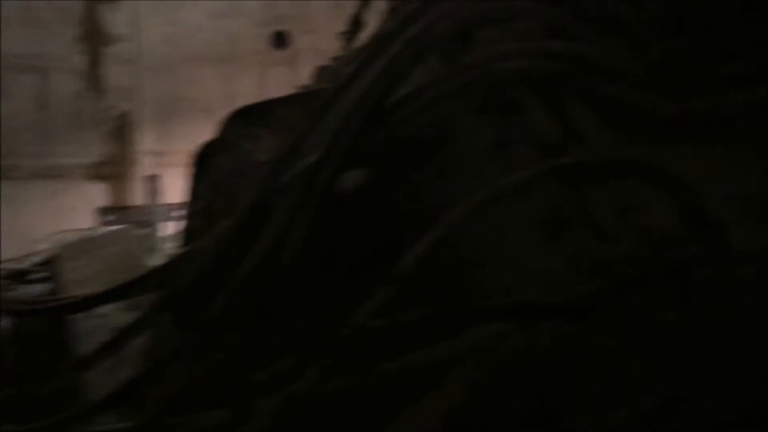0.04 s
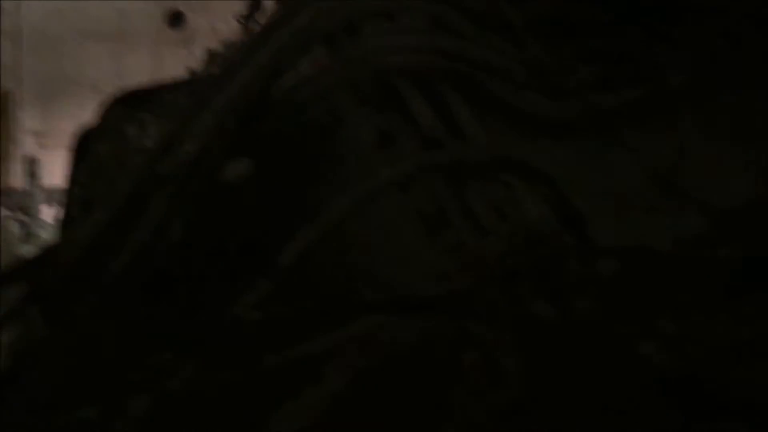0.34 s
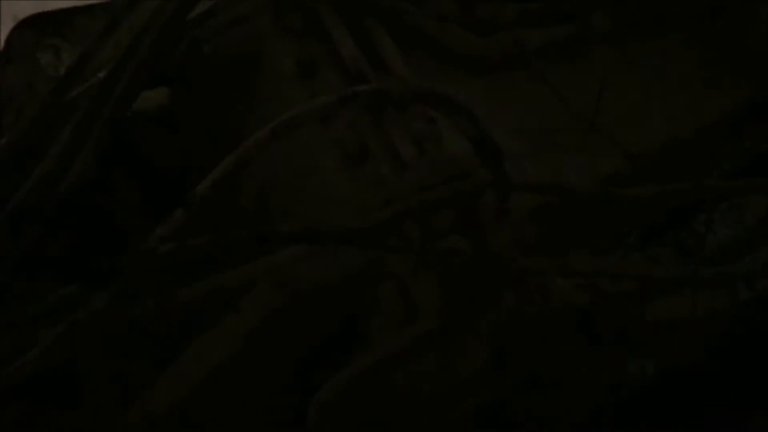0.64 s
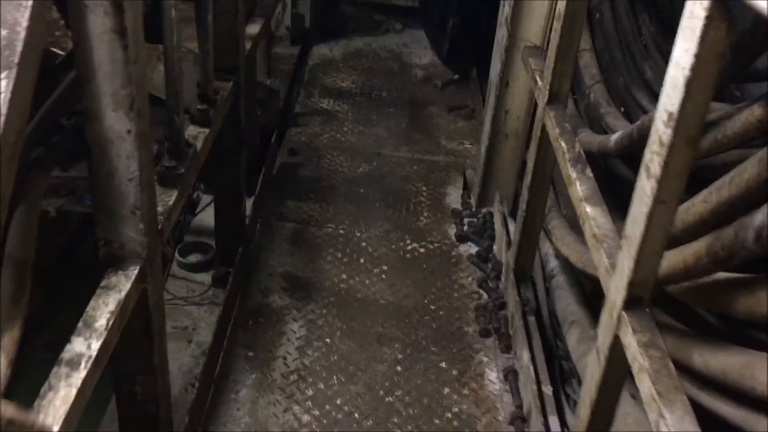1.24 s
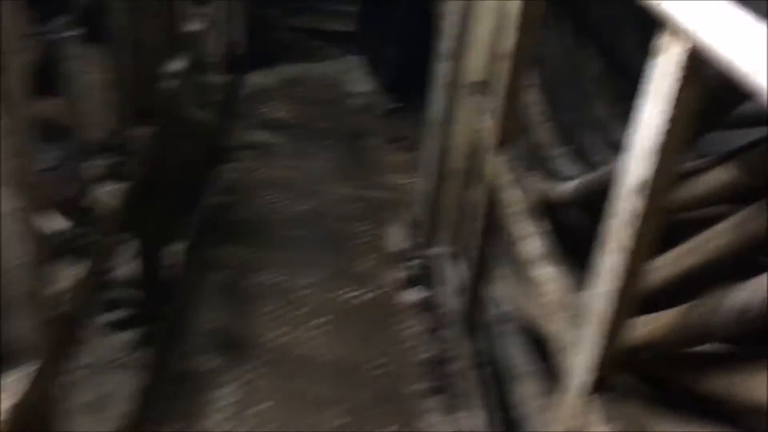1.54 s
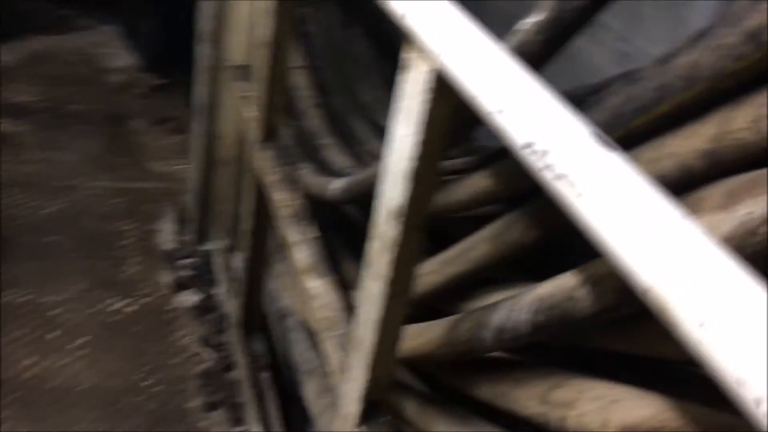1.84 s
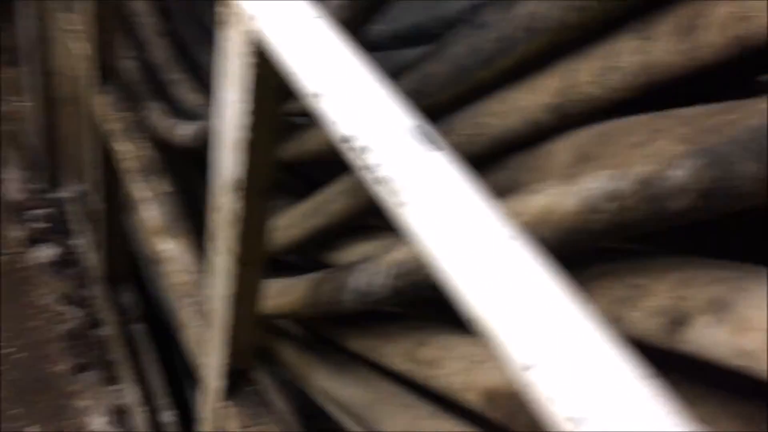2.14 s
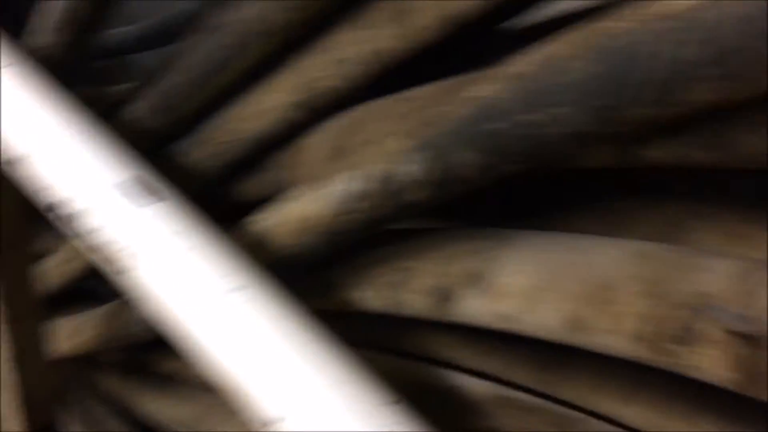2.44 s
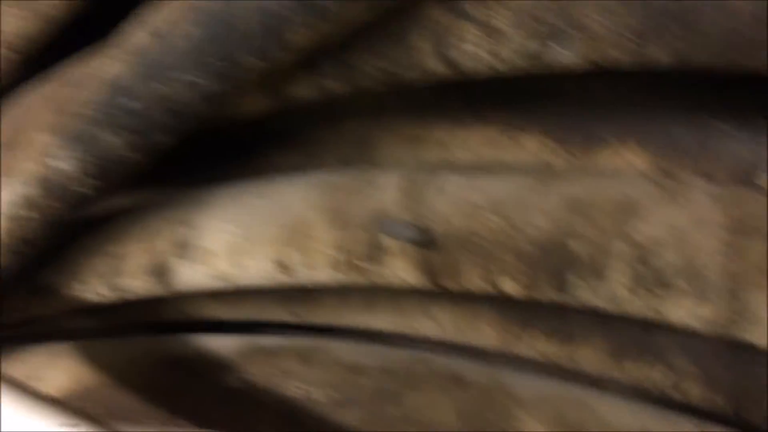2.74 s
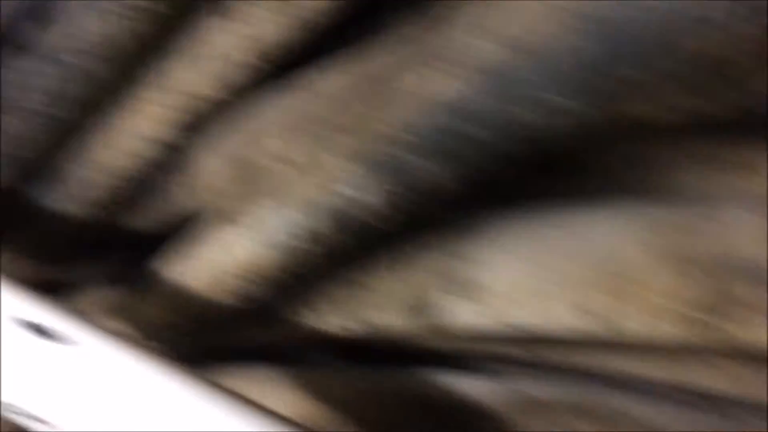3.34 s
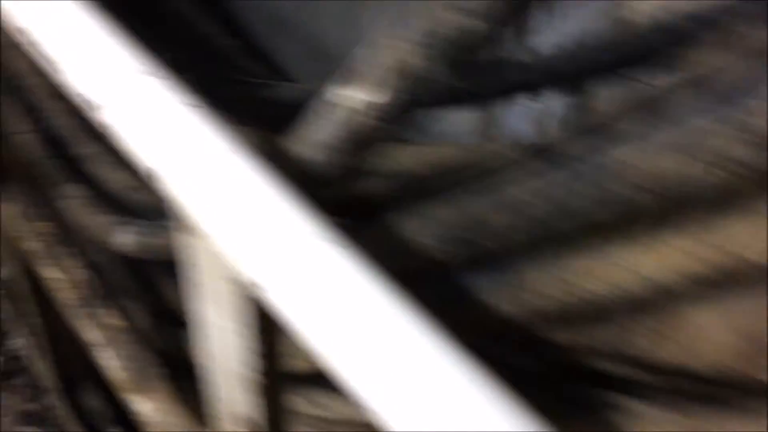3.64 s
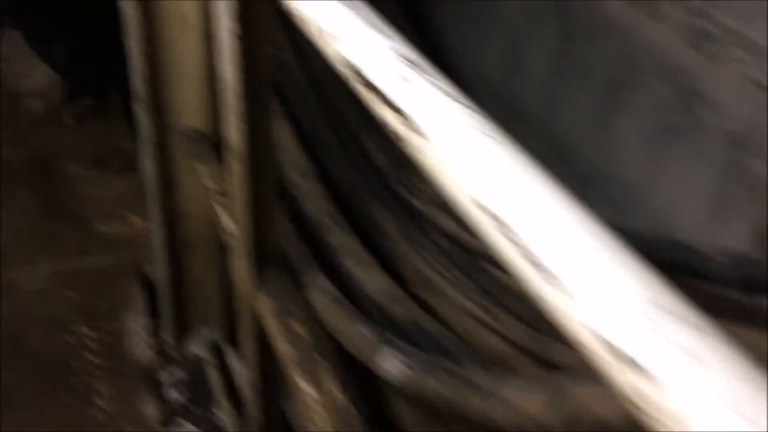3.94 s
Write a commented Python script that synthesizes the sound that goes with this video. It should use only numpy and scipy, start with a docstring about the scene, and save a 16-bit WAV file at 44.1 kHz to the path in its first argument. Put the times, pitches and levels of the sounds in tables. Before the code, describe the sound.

A pump motor's steady hum fills a tunnel, with roaring ventilation and a low rumble.

```python
"""A pump motor hums on its fifth shaft order in a tunnel, over ventilation roar and low rumble.
Shaft harmonics make the hum and a whine; reverberation makes the tones waver. Moving air makes the
noise, with narrow peaks and dips above 700 Hz. Heard first beside the machine, then, after a short
silence, from a steel walkway, where other motors hum along and a thin hiss fades and returns."""
import sys
import numpy as np
from scipy import signal
from scipy.fft import rfft, irfft
from scipy.io import wavfile

SR = 44100
rng = np.random.default_rng(int(sys.argv[2]) if len(sys.argv) > 2 else 0)


def unload_wav(signal):
    """Save mono or channel-first audio to the path in sys.argv[1] as 16-bit WAV at rate SR, clipped to [-1, 1]."""
    wavfile.write(
        sys.argv[1],
        SR,
        np.round(np.clip(np.atleast_2d(signal).T, -1, 1) * 32767).astype(np.int16),
    )


N = 176400
T = np.arange(N) / SR
FREQS = np.maximum(np.fft.rfftfreq(N, 1 / SR), 1)
SHAFT_HZ = 58.31

# listening spots (0 beside the machine, 1 walkway): start t/s, end t/s
SPOTS = [(-0.01, 0.984), (1.116, 4.02)]
# base air noise density: f/Hz, machine level/(dB per Hz), walkway level/(dB per Hz)
AIR_SPECTRUM = [(22, -70, -66), (35.2, -64.5, -63), (55.6, -40.5, -45.5), (75, -40.5, -46),
                (113, -47, -46.5), (160, -43.5, -49.5), (199.6, -48.5, -47), (236.4, -40.5, -43),
                (269, -46, -47), (313, -43, -53), (385, -52.5, -54.5), (424, -47, -54.5), (500, -51, -50),
                (547, -46.5, -51), (631, -53, -53), (696, -55.5, -58), (770, -51.5, -55.5),
                (1076, -54.5, -61), (1465, -56.5, -59.5), (1796, -56.5, -62.5), (2004, -62, -66.5),
                (2670, -66.5, -72), (3270, -71.5, -75.5), (4010, -75.5, -74.5), (4790, -78.5, -84.5),
                (5680, -79.5, -83), (7800, -87, -90), (9450, -88, -89.5), (10400, -94.5, -95),
                (11500, -91.5, -92.5), (15400, -96, -91)]
# swells of the four air bands, per spot: t/s, gain/dB
DEEP_SWELL = [
    [(0, 1), (.25, 0), (.48, 0), (.66, -8), (.8, 2), (.98, 3)],
    [(1.12, -6), (1.55, -10), (1.85, 0), (2.2, 1), (2.55, 1), (3.3, -3.5), (3.78, 8), (4, 5.5)],
]
RUMBLE_SWELL = [
    [(0, 2.5), (.3, 0.5), (.48, -1.5), (.66, -4), (.78, 4), (.98, -8)],
    [(1.12, 0), (1.5, 0), (2.2, -1), (3.25, -0.5), (3.7, -2), (3.78, -2), (4, -6)],
]
ROAR_SWELL = [
    [(0, .3), (.38, -0.14), (.65, -0.61), (.98, -1)],
    [(1.12, 3), (1.45, 0.4), (2.4, 0.06), (3, -1.4), (3.4, -0.7), (3.9, 1.5)],
]
HISS_SWELL = [
    [(0, -.8), (.4, .8), (.98, -0.2)],
    [(1.12, 4.5), (1.65, 2.5), (2.4, 0.2), (3, -3), (3.4, -3.8), (3.8, 1)],
]
# motors along the walkway: f/Hz, level/dB
MOTOR_TONES = [(120, -35.5), (551, -32.5), (775, -39), (953, -42), (1809, -51.5)]
# fan tone and its rush in the duct: t/s, level/dB
FAN_LEVEL = [(1.12, -30), (1.3, -28), (1.45, -27), (1.55, -31), (1.63, -29.5), (1.78, -26), (1.98, -39),
             (2.15, -32), (2.4, -46), (2.85, -47), (3.15, -28), (3.42, -31), (3.6, -36)]
RUSH_LEVEL = [(1.12, -26.5), (1.6, -28), (1.95, -36), (2.5, -35), (3.05, -40), (3.5, -27), (4, -35)]
# faint pump tones: shaft order (rounded in use), machine level/dB, walkway level/dB
PUMP_TONES = [(1, -29.5, -34), (2, -36, -35.5), (7, -39, -54), (10, -31.5, -39), (15, -44, -40),
              (17, -37, -56.5), (20, -35.5, -41.5), (25, -35, -46.5), (29, -52, -61), (30, -48, -57),
              (35, -52, -62), (40, -43.5, -65), (41, -52.5, -73), (44, -55, -70), (49, -58, -60),
              (50, -63, -57.5), (54, -63, -69), (62.4, -54, -69), (71, -57, -67), (72.5, -55, -76),
              (89.6, -63, -73)]
# pump hum (order 5) and drone (order 4), per spot: t/s, level/dB
HUM_LEVEL = [
    [(0, -20), (.5, -17.5), (.98, -17.5)],
    [(1.12, -16), (2.2, -16), (2.72, -14.5), (3.25, -15.5), (3.52, -18.5), (3.67, -28), (3.78, -23),
     (4, -20.5)],
]
DRONE_LEVEL = [
    [(0, -30), (.19, -40), (.27, -26), (.46, -18), (.66, -22), (.85, -26.5)],
    [(1.12, -21.5), (1.41, -19), (1.55, -29), (2.6, -30), (3.35, -31.5), (3.6, -24), (3.71, -29),
     (3.77, -14), (3.84, -37), (3.93, -17.5), (4, -33)],
]
# treble dropouts: centre t/s, length/s, edge f/Hz, gain/dB
TREBLE_DIPS = [(0.17, 0.012, 5000, -13.5), (0.321, 0.029, 5430, -27), (0.621, 0.0093, 3600, -15),
               (3.65, .012, 3800, -16)]


def from_db(db):
    """Decibels to gain."""
    return 10 ** (np.asarray(db) / 20)


def unit_rms(x):
    """Scale to rms 1."""
    return x / np.sqrt(np.mean(x ** 2) + 1e-20)


def curve(rows):
    """Linear interpolation of (t/s, value) rows."""
    return np.interp(T, *np.transpose(rows))


def lowpass_power(edge_hz, order):
    """Low-pass power response over FREQS."""
    return 1 / (1 + (FREQS / edge_hz) ** (2 * order))


def noise(gain):
    """White noise shaped by a gain over FREQS."""
    return irfft(rfft(rng.standard_normal(N)) * gain, N)


def drift(corner_hz):
    """Random wander, mean 0, rms 1."""
    gain = lowpass_power(corner_hz, order=1)
    gain[0] = 0
    return unit_rms(noise(gain))


def tone(hz, db, waver_db=1.5, waver_rad=0.42, waver_hz=3.4):
    """Machine tone; level and phase waver in the reverberant tunnel."""
    phase = 2 * np.pi * (hz * T + rng.random()) + waver_rad * drift(waver_hz)
    return np.sqrt(2) * from_db(db + waver_db * drift(waver_hz)) * np.sin(phase)


def air_density_db(spot, hz):
    """Base air noise density at a spot, interpolated in log frequency."""
    table = np.array(AIR_SPECTRUM)
    return np.interp(np.log(hz), np.log(table[:, 0]), table[:, 1 + spot])


def spectral_ripple(spread_db=1.9, step_hz=45.45, from_hz=700):
    """Gain over FREQS: random narrow peaks and dips that colour the air noise above from_hz."""
    bumps = np.interp(FREQS, np.arange(4000) * step_hz, rng.standard_normal(4000))
    return from_db(spread_db * bumps * (1 - lowpass_power(from_hz, order=2)))


def ventilation(spot, flutter_db=0.53, flutter_hz=37):
    """Moving air in the tunnel; four bands swell and flutter independently."""
    colour = from_db(air_density_db(spot, FREQS)) * spectral_ripple() * np.sqrt(SR / 2)
    colour *= np.sqrt(1 - lowpass_power(edge_hz=16, order=2))
    deep, low, low_mid = (lowpass_power(hz, order=4) for hz in (87, 196, 8900))
    bands = [(deep, DEEP_SWELL), (low - deep, RUMBLE_SWELL),
             (low_mid - low, ROAR_SWELL), (1 - low_mid, HISS_SWELL)]
    out = np.zeros(N)
    for power, swell in bands:
        air = noise(colour * np.sqrt(np.abs(power)))
        out += air * from_db(curve(swell[spot]) + flutter_db * drift(flutter_hz))
    return out


def fan(blade_hz=569.7, duct_hz=553, width_hz=60):
    """Fan tone plus the rush it excites in a duct resonance."""
    hum = tone(blade_hz, curve(FAN_LEVEL), waver_db=2.6, waver_rad=0.32)
    duct = 1 / (1 + (2 * (FREQS - duct_hz) / width_hz) ** 2)
    return hum + from_db(curve(RUSH_LEVEL)) * unit_rms(noise(duct))


def other_motors():
    """Walkway motors, beating against the pump."""
    return sum(tone(hz, db) for hz, db in MOTOR_TONES)


def pump_whine(spot, spread_db=3):
    """Uneven high shaft orders: the same rattle every turn, swelling with the roar."""
    orders = np.arange(31, 125)
    turn = np.linspace(0, 1, 4097)
    uneven = unit_rms(from_db(rng.normal(0, spread_db, len(orders))))
    gains = from_db(air_density_db(spot, orders * SHAFT_HZ)) * uneven
    phase_turns = np.outer(orders, turn) + rng.random((len(orders), 1))
    cycle = gains @ np.sin(2 * np.pi * phase_turns)
    cycle *= np.sqrt(2 * SHAFT_HZ)  # density to sine amplitude
    ratio_to_air = (0.46, 0.24)[spot]
    return ratio_to_air * from_db(curve(ROAR_SWELL[spot])) * np.interp(SHAFT_HZ * T % 1, turn, cycle)


def pump(spot):
    """Shaft harmonics: strong fifth, swelling fourth, fainter others."""
    hum = tone(5 * SHAFT_HZ, curve(HUM_LEVEL[spot]), waver_db=0.53, waver_rad=0.1)
    drone = tone(4 * SHAFT_HZ, curve(DRONE_LEVEL[spot]), waver_db=-0.2, waver_rad=0.2)
    faint = sum(tone(round(order) * SHAFT_HZ, levels_db[spot]) for order, *levels_db in PUMP_TONES)
    return hum + drone + faint


def scene(fade_s=0.0055, tail_db=-16, decay_db_per_s=1400):
    """Beside the machine, brief dull tail, silence, then the walkway."""
    machine, walkway = (pump(spot) + pump_whine(spot) + ventilation(spot) for spot in range(2))
    walkway += fan() + other_motors()
    out = np.zeros(N)
    for sound, (start_s, end_s) in zip((machine, walkway), SPOTS):
        inside_s = np.minimum(T - start_s, end_s - T)
        out += sound * np.clip(inside_s / fade_s + 0.5, 0, 1) ** 2
    since_stop_s = T - SPOTS[0][1]
    dull = irfft(rfft(machine) * np.sqrt(lowpass_power(edge_hz=2000, order=1)), N)
    tail = dull * (since_stop_s > 0) * from_db(tail_db - decay_db_per_s * np.abs(since_stop_s))
    return (out + tail)[None]


def record(dry, ramp_s=0.005, cutoff_hz=15780):
    """Four brief treble dropouts, then a steep low-pass."""
    out = dry
    for centre_s, length_s, edge_hz, gain_db in TREBLE_DIPS:
        treble = irfft(rfft(out) * (1 - lowpass_power(edge_hz, order=8)), N)
        dip = np.clip((length_s / 2 - np.abs(T - centre_s)) / ramp_s + 0.5, 0, 1)
        out = out - treble * (1 - from_db(gain_db * dip))
    return signal.sosfilt(signal.ellip(14, 0.1, 80, cutoff_hz, fs=SR, output="sos"), out)


dry = scene()
out = record(dry)
unload_wav(out)
```